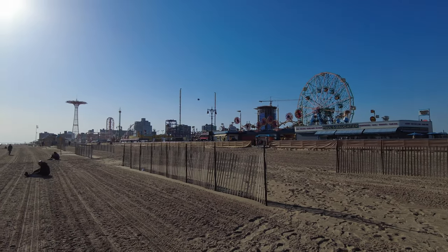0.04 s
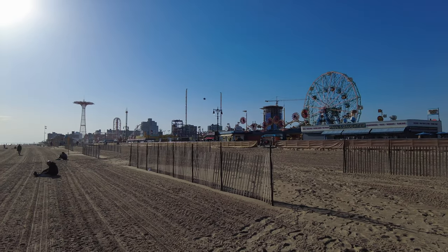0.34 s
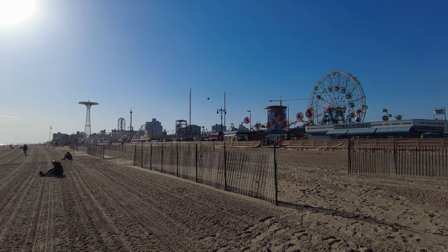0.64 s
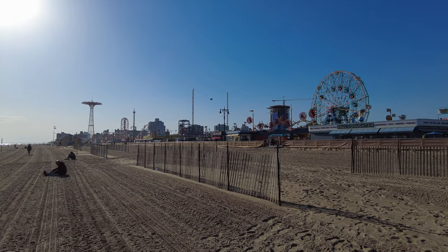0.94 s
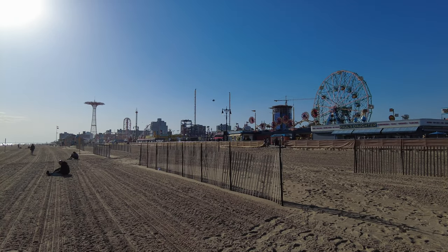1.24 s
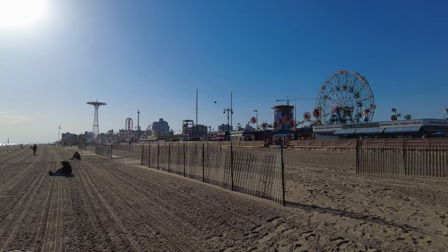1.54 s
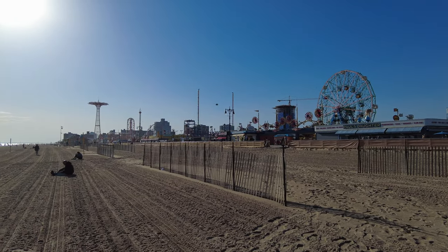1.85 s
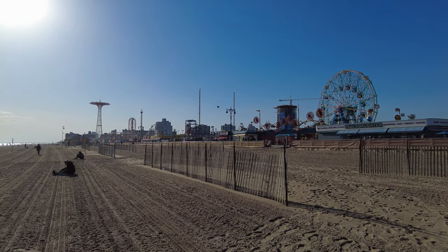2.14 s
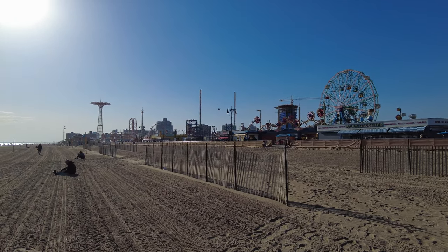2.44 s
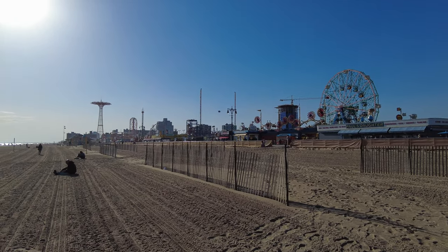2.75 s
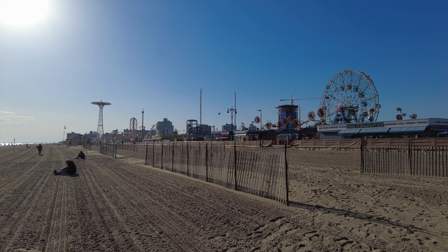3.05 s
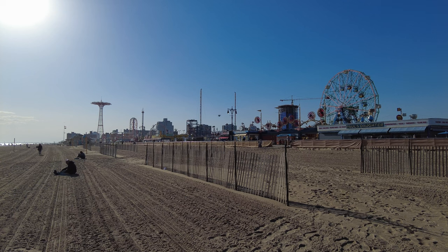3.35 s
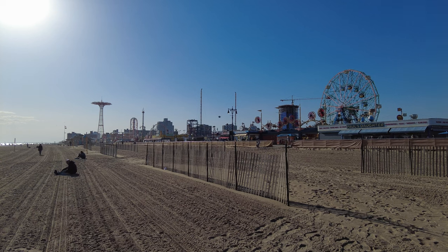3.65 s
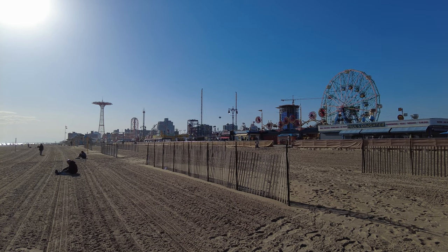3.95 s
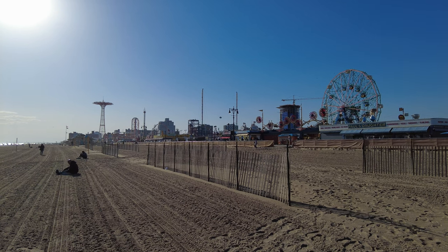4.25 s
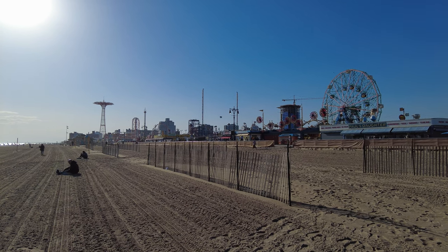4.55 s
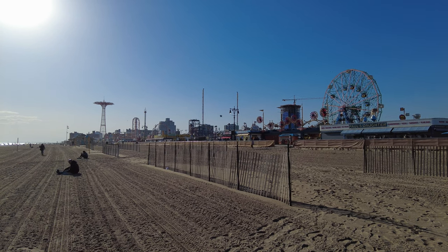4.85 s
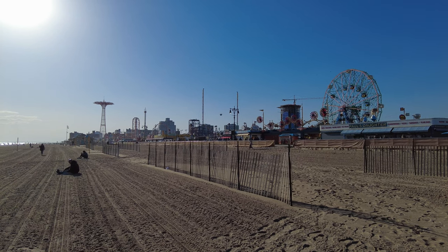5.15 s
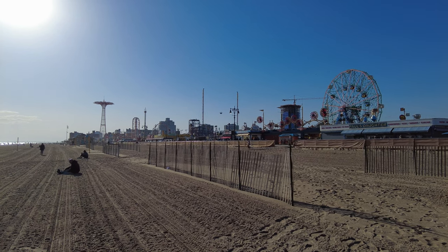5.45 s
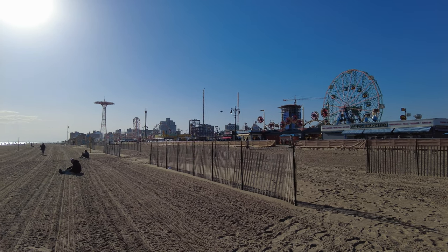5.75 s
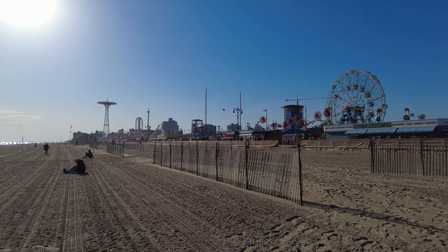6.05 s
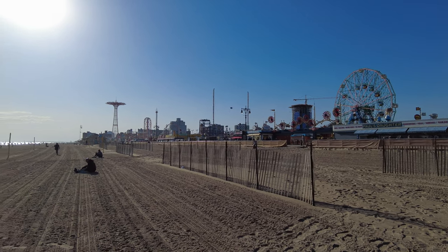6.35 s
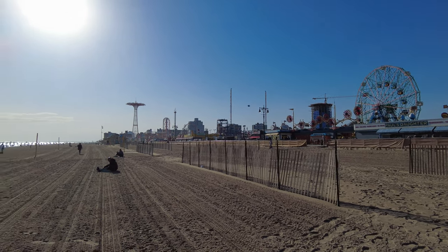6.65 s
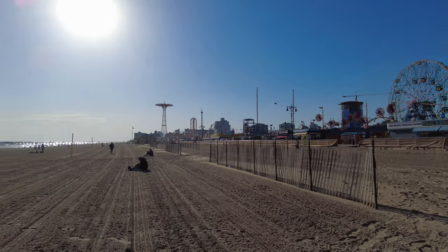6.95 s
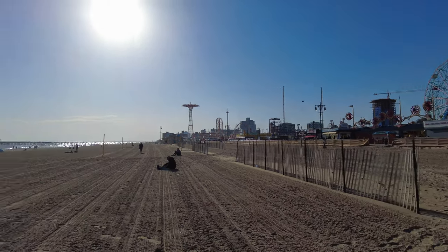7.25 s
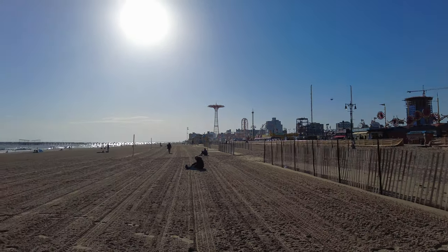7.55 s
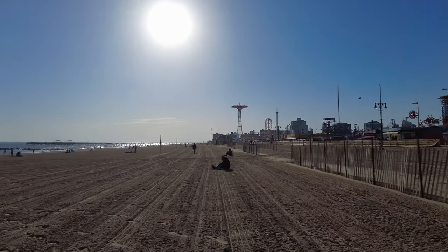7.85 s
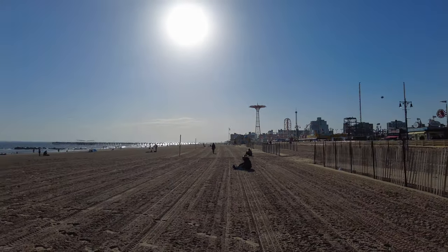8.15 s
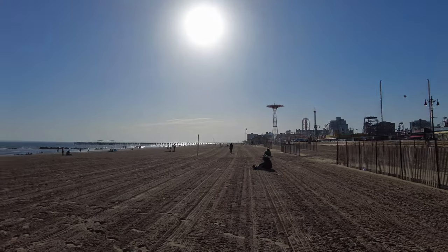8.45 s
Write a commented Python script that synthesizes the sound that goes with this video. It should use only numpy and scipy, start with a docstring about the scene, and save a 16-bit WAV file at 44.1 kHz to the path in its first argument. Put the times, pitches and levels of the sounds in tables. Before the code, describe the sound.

Low gusts of wind buffet the microphone on a beach, with waves washing faintly in the distance. A gull squawks, then brief, sharp yelps follow one after another from the right, some clear and some hoarse. The calls grow softer in the second half and end shortly before the close, leaving a light hiss of sea foam and a returning rumble of wind.

```python
"""Gulls on an open beach, over distant surf and wind buffeting two microphones. A low squawk opens,
then five yelps: short arched harmonic cries, the first cracking upward, the second breaking into a rasp.
Two tiny ticks at 2.3 s; the loudest yelps at 2.9 and 3.6 s; softer ones until 6.8 s, among two more
squawks and two faint far whistles. The cries come from the right, with a faint echo. Near 7.7 s the
surf brightens with the hiss of foam while the wind lulls; the wind rises again at the end."""
import sys
import numpy as np
from scipy import signal
from scipy.fft import rfft, irfft, next_fast_len
from scipy.io import wavfile
from scipy.ndimage import uniform_filter1d

SR = 44100
rng = np.random.default_rng(int(sys.argv[2]) if len(sys.argv) > 2 else 0)


def output_pcm(signal):
    """Save a mono or channel-first signal as 16-bit PCM at the path in sys.argv[1].

    Samples are clipped to [-1, 1] before scaling.
    """
    pcm = np.clip(np.atleast_2d(signal).T, -1, 1) * 32767
    wavfile.write(sys.argv[1], SR, np.round(pcm).astype(np.int16))


N = 378819
TIME = np.arange(N) / SR
ENDING_DB = -19  # fade over a cry's final fall


def gain_of(db):
    """Decibels to amplitude."""
    return 10 ** (np.asarray(db) / 20)


def unit_rms(x):
    """Scale to rms 1."""
    return x / np.sqrt(np.mean(x ** 2) + 1e-20)


def at_hz(points, hz):
    """Interpolate a table over log frequency."""
    f, value = np.transpose(points)
    return np.interp(np.log(hz + 1), np.log(f + 1), value)


def over_time(points):
    """Interpolate a table over the scene's time."""
    return np.interp(TIME, *np.transpose(points))


def add(mix, start_s, sound):
    """Mix a sound in at start_s."""
    part = mix[max(round(start_s * SR), 0):][:len(sound)]
    part += sound[:len(part)]


def coloured(x, spectrum):
    """Filter by a table of f/Hz, gain/dB."""
    size = next_fast_len(len(x))
    gain = gain_of(at_hz(spectrum, np.fft.rfftfreq(size, 1 / SR)))
    return irfft(rfft(x, size) * gain, size)[:len(x)]


def shaped_noise(count, spectrum):
    """Coloured noise, rms 1."""
    return unit_rms(coloured(rng.standard_normal(count), spectrum))


def wobble(count, corner_hz):
    """Low-passed random drift, rms 1."""
    size = next_fast_len(count)
    hz = np.fft.rfftfreq(size, 1 / SR)
    return unit_rms(irfft(rfft(rng.standard_normal(size)) / (1 + (hz / corner_hz) ** 2), size)[:count])


def surf(wash_db=7.0, foam_db=8, patchy_db=0.9849):
    """Far breakers: a dull wash and a hiss of foam, both in drifting patches."""
    # spectra of wash and foam: f/Hz, relative density/dB
    wash_spectrum = [(60, -2), (200, 4.5), (330, -3), (600, 1), (900, -2), (1300, -3.5), (2000, -8.5),
                     (3000, -16), (5000, -27.5), (9000, -37), (15000, -44)]
    foam_spectrum = [(600, -27), (2000, 3.5), (3500, 5), (5000, 0), (7000, -6), (10000, -14),
                     (12500, -23.5), (15500, -30.5)]
    # their swells: t/s, relative level/dB
    wash_swell = [(0, -53.5), (2.0, -53.5), (3.6, -55.5), (6.2, -55), (8.0, -53.5), (8.59, -54)]
    foam_swell = [(0, -68.5), (1.5, -67.5), (2.7, -70), (4.3, -73), (5.0, -70), (5.6, -72), (6.9, -71),
                  (7.7, -64.5), (8.59, -67)]
    # left-right likeness: f/Hz, correlation
    likeness = [(100, -0.6554), (300, 0.99), (600, -0.1175), (1200, 0), (4000, 0), (12000, 0)]
    # balance: f/Hz, left minus right/dB
    balance = [(60, 1.5), (130, 1.0), (290, 6.35), (640, 6.98), (1410, 6.143), (3100, 4.86), (6820, 2.929),
               (15000, 1.5)]
    frames, hz = N // 256 + 5, np.fft.rfftfreq(1024, 1 / SR)
    correlation = at_hz(likeness, hz)
    side_db = at_hz(balance, hz) / 2
    out = np.zeros((2, N))
    layers = (wash_spectrum, wash_swell, wash_db), (foam_spectrum, foam_swell, foam_db)
    for spectrum, swell, db in layers:
        a, b, c, d, patches = rng.standard_normal((5, frames, len(hz)))
        patches = unit_rms(uniform_filter1d(uniform_filter1d(patches, 20, axis=0), 12, axis=1))
        left = a + 1j * b
        right = correlation * left + np.sqrt(1 - correlation ** 2) * (c + 1j * d)
        bins = np.array([left * gain_of(side_db), right * gain_of(-side_db)])
        bins *= gain_of(at_hz(spectrum, hz) + patchy_db * patches)
        noise = signal.istft(bins.swapaxes(1, 2), nperseg=1024, noverlap=768)[1][:, :N]
        out += unit_rms(noise) * gain_of(db + over_time(swell))
    return out


def far_whistles(waver=0.0061):
    """Thin wavering tones, barely above the surf."""
    # whistles: t/s, length/s, f/Hz, level/dB
    whistles = [(5.104, 0.192, 1311, -60.5), (6.204, 0.39, 1303, -63)]
    out = np.zeros(N)
    for start_s, length_s, hz, db in whistles:
        count = int(length_s * SR)
        phase = 2 * np.pi * np.cumsum(hz * (1 + waver * wobble(count, corner_hz=41.96))) / SR
        add(out, start_s, gain_of(db) * np.sqrt(2) * np.sin(phase) * signal.windows.tukey(count, .5))
    return out


def ticks(decay_s=0.000657):
    """Tiny dry ticks: bright noise, dying in about a millisecond."""
    # ticks: t/s, initial level/dB
    hits = [(2.303, -53), (2.313, -60)]
    # their spectrum: f/Hz, relative density/dB
    spectrum = [(2000, -30), (6000, 2.5), (9000, -3.5), (13000, -3.5), (15000, -13)]
    out, t = np.zeros(N), TIME[:512]
    for start_s, db in hits:
        add(out, start_s, gain_of(db) * shaped_noise(len(t), spectrum) * np.exp(-t / decay_s))
    return out


def wind(gain_db=6.5, opposed=0.1735, lean_db=0.57, sway_db=0.13, lumpy_db=1.99, puff_s=0.0314):
    """Eddies press on the two microphones in lumps and puffs, partly in opposite senses."""
    # eddy rumble: f/Hz, relative density/dB
    rumble = [(6, -4), (16, 2), (30, 1.5), (50, -3), (80, -8.5), (120, -15), (180, -21.5), (280, -41),
              (500, -39), (1500, -83)]
    # slow rise and fall: t/s, relative level/dB
    breeze = [(0, -35), (0.8, -39.5), (1.6, -37), (2.9, -35), (3.7, -37.5), (4.5, -40.5), (5.0, -36.5),
              (5.25, -41.5), (5.75, -38.5), (6.05, -34), (6.3, -39), (6.85, -40), (7.75, -45.5),
              (8.05, -41), (8.35, -35.5), (8.59, -32.5)]
    # strongest puffs: t/s, level over the breeze/dB
    puffs = [(0.06, 3.5), (1.02, 7), (1.25, 5.5), (1.57, 7), (2.11, 6.5), (2.84, 5.5), (3.23, 2),
             (3.86, 4.5), (4.08, 3), (5.05, 4), (6.51, 5)]
    left = shaped_noise(N, rumble)
    right = np.sqrt(1 - opposed ** 2) * shaped_noise(N, rumble) - opposed * left
    side_db = lean_db + sway_db * wobble(N, corner_hz=0.58)
    puff_db = sum(db * np.exp(-((TIME - peak_s) / puff_s) ** 2) for peak_s, db in puffs)
    level_db = gain_db + over_time(breeze) + lumpy_db * wobble(N, corner_hz=5) + puff_db
    return np.array([left, right]) * gain_of(level_db + np.array([side_db, -side_db]))


def echoes(x, gap_s=0.016, taps_per_s=900):
    """Sparse reflections off sand, fence and buildings, different on each side."""
    # decay: f/Hz, T60/s
    t60 = [(500, 0.44), (2000, 0.555), (4500, 0.9), (10000, 0.31)]
    taps = rng.standard_normal((2, SR)) * (rng.random((2, SR)) < taps_per_s / SR) * (TIME[:SR] > gap_s)
    hz, t, bins = signal.stft(taps, SR, nperseg=256)
    tail = signal.istft(bins * gain_of(-60 * t / at_hz(t60, hz)[:, None]), SR, nperseg=256)[1]
    return signal.fftconvolve(x[None], tail / np.linalg.norm(tail[0]), axes=1)[:, :N]


def syrinx(hz, level_db, second_db, upper_db, rough, rasp_db=6.5, voice_db=1, slope_db_per_oct=8):
    """A gull's voice: eight harmonics; with roughness the cycles turn uneven and rasp."""
    # resonances of throat and open bill: f/Hz, gain/dB
    throat = [(2300, -3.5), (3100, 11.5), (3700, 16), (4500, 1.5), (5300, -5.5), (5900, -10.5), (6500, -4),
              (8000, -9.5), (10000, -17.5), (12000, -31), (14000, -35)]
    # rasp of a broken voice, and its hoarse upper edge: f/Hz, relative density/dB
    rasp_spectrum = [(600, -47), (850, -11.5), (1150, 3), (1550, -3), (1900, -1.5), (2400, -2), (3200, -12),
                     (3800, -10), (4700, -32), (6000, -30.5), (9000, -50.5)]
    edge_spectrum = [(2000, -23.5), (3000, 8), (3700, -5), (4900, -5), (6000, -3.5), (7000, -11),
                     (8500, -20), (11000, -33), (14000, -53)]
    rough, count = np.clip(rough, 0, 1), len(hz)
    jitter = (0.0039 + 0.0827 * rough) * wobble(count, corner_hz=380)
    phase = 2 * np.pi * np.cumsum(hz * (1 + jitter)) / SR
    lower = np.sqrt(2 * (1 - rough ** 2)) * (np.cos(phase) + gain_of(second_db) * np.cos(2 * phase))
    k = np.arange(3, 9)[:, None]
    share = gain_of(at_hz(throat, k * hz) - slope_db_per_oct * np.log2(k))
    upper = np.sqrt(2) * (share * np.cos(k * phase)).sum(0) / np.linalg.norm(share, axis=0)
    rasp = rough ** 1.8 * shaped_noise(count, rasp_spectrum)
    dissolved = np.clip(2.222 * rough, 0, 1)  # upper harmonics turn to noise first
    upper = np.sqrt(1 - dissolved ** 2) * upper + dissolved * shaped_noise(count, edge_spectrum)
    flutter = 1 + 0.3687 * rough * wobble(count, corner_hz=180)  # uneven membrane beats
    sound = gain_of(voice_db) * lower + gain_of(upper_db) * upper + gain_of(rasp_db) * rasp
    return gain_of(level_db) * flutter * sound * signal.windows.tukey(count, .06)


def arch(t, length_s, rise_s, first_hz, last_hz, scoop, drop, fall_s=0.037, attack_s=0.0234,
         onset_db=-21, sag_per_s=0.4692, sag_db_per_s=-51.5):
    """A cry scoops up, sags as it holds, slides down. Returns f/Hz, level/dB, fall progress 0-1."""
    hold_s = max(length_s - rise_s - fall_s, 1e-3)
    early_s = np.maximum(rise_s - t, 0)
    held = np.clip((t - rise_s) / hold_s, 0, 1)
    fall = np.clip(1 - (length_s - t) / fall_s, 0, 1)
    sag_s = hold_s * np.sin(np.pi * held) ** 2  # longer holds sag more
    bend = (1 - scoop * (early_s / rise_s) ** 2) * (1 - sag_per_s * sag_s) * (1 - drop * fall ** 2)
    hz = (first_hz + (last_hz - first_hz) * held) * bend
    attack_db = onset_db * np.tanh(early_s / attack_s) ** 2.045
    return hz, attack_db + sag_db_per_s * sag_s + ENDING_DB * fall ** 1.12, fall


def register(t, span_s, switch_s=0.00424):
    """Voice register gate: 1 within span_s, then 0; spans up to switch_s are ignored."""
    return np.clip((span_s - t) / switch_s + .5, 0, 1) * (span_s > switch_s)


def second_tone(length_s, top_hz, db, scoop=0.092, fade_db=-16):
    """The other side of the syrinx sounds a nearly pure tone that rises, swells and fades."""
    progress = np.linspace(0, 1, int(length_s * SR))
    hz = top_hz * (1 - scoop * (1 - progress) ** 4)
    level_db = db + fade_db * (2 * progress - 1) ** 2
    return syrinx(hz, level_db, second_db=-29, upper_db=-37, rough=np.full(len(hz), 0.27))


def squawk(length_s, rise_s, first_hz, last_hz, scoop, drop, db, upper_db, broken_s,
           settle_s=0.18, clearing_db=7, throb_db=0.88, bite_db=21, bill_db=11):
    """A low rough cry that breaks and throbs, brightens as the bill opens and clears in the fall."""
    t = np.arange(0, length_s, 1 / SR)
    hz, shape_db, fall = arch(t, length_s, rise_s, first_hz, last_hz, scoop, drop)
    broken, progress = register(length_s - t, broken_s), t / length_s
    settling = np.exp(-np.maximum(t - length_s + broken_s, 0) / settle_s)
    broken_db = -3.5 + throb_db * wobble(len(t), corner_hz=70)
    level_db = db + shape_db + broken * broken_db + clearing_db * fall
    second_db = -19.5 + bite_db * progress ** 2 * (1 - fall ** 2)
    upper_db = upper_db + bill_db * (progress - .5) + ENDING_DB * fall ** 2
    rough = (0.237 + 0.526 * broken * settling) * (1 - fall)
    return syrinx(hz, level_db, second_db, upper_db, rough)


def yelp(length_s, rise_s, first_hz, last_hz, scoop, drop, db, second_db, upper_db, hoarse,
         thin_s, broken_s, clearing_db=10, waver_db=2.33, bill_db=7, swell_db_per_s=340):
    """A high cry, growing hoarser; it may open thin and crack upward, or break into a rasp."""
    # second and upper harmonics as the pitch moves them through the throat: f0/Hz, relative level/dB
    second_by_pitch = [(1000, -23.5), (1200, -17), (1350, -6), (1500, -2.5), (1750, -8), (1920, -7.5),
                       (2060, -14), (2350, -18)]
    upper_by_pitch = [(1100, -11.5), (1450, -14.5), (1800, -19.5), (2080, -25.5), (2350, -21.5)]
    t = np.arange(0, length_s, 1 / SR)
    hz, shape_db, fall = arch(t, length_s, rise_s, first_hz, last_hz, scoop, drop)
    thin, broken = register(t, thin_s), register(length_s - t, broken_s)
    full, progress = 1 - thin, t / length_s
    hz = hz * 0.715 ** thin * 0.79 ** broken  # both registers lie lower
    depth = 1 + 0.0336 * (db + 27)  # softer cries have flatter envelopes
    level_db = db + full * depth * shape_db - 16.5 * thin + broken * (clearing_db * fall - 2.3)
    opening_db = bill_db * (progress - .5)  # harmonics gain as the bill opens
    swell_db = swell_db_per_s * (t - thin_s)  # thin harmonics swell up to the crack
    second_db = at_hz(second_by_pitch, hz) + full * (second_db + opening_db) + thin * (20.5 + swell_db)
    second_db += waver_db * wobble(len(t), corner_hz=70) - 9 * broken
    upper_db = at_hz(upper_by_pitch, hz) + full * (upper_db + opening_db) + thin * (10 + swell_db)
    upper_db += waver_db * wobble(len(t), corner_hz=70)
    rough = hoarse * progress ** 1.4 + 0.56 * broken * (1 - fall)
    return syrinx(hz, level_db, second_db, upper_db, rough)


def gulls(lag_s=0.0009642, echo_db=-25, slap_s=0.074, slap_db=-33):
    """Cries from the right: the shadowed left microphone hears them later and weaker."""
    # yelps: t/s, length/s, rise/s, f after rise/Hz, f before fall/Hz, scoop 0-1, drop 0-1, level/dB,
    # second harmonic offset/dB, upper harmonics offset/dB, hoarseness 0-1, thin start/s, broken end/s
    yelps = [ (0.181, 0.1256, 0.0448, 2007, 2002, 0.33, 0.16, -28, 2, 4, 0.04, 0.0397, 0.0038),
             (0.498, 0.1375, 0.0445, 1924, 1970, 0.37, 0.24, -32.5, 4.5, -5, 0, 0.0053, 0.0663),
             (0.873, 0.132, 0.0557, 2081, 2338, 0.55, 0.15, -27, 4, 1, 0.14, 0.0025, 0.0061),
             (1.263, 0.0947, 0.0353, 2070, 2103, 0.18, 0.16, -38, -1, -6, 0.09, 0.0031, 0.00723),
             (1.848, 0.0758, 0.0249, 2279, 2319, 0.06, 0.1, -43, 2, 4.5, 0.11, 0, 0.0033),
             (2.918, 0.1082, 0.0305, 2210, 2321, 0.06, 0.3, -25.5, -1.5, -2, 0.14, 0.000095, 0.0018),
             (3.597, 0.1197, 0.032, 2187, 1979, 0.08, 0.6, -25.5, -3.5, 1, 0.37, 0.000042, 0.0038),
             (4.198, 0.0914, 0.0482, 1804, 1833, 0.19, 0.29, -41, -3, -14, 0, 0, 0.0048),
             (4.609, 0.121, 0.03425, 2095, 2033, 0.03, 0.44, -29.5, -6.5, -6, 0.12, 0.000015, 0.0039),
             (4.923, 0.1156, 0.045, 2084, 2218, 0.13, 0.41, -33.5, -2, -2.5, 0.2, 0.042, 0.0047),
             (5.272, 0.0726, 0.034, 1790, 1830, 0.14, 0.21, -51.5, -2, -9, 0.05, 0, 0.0076),
             (5.723, 0.0896, 0.0406, 2146, 2139, 0.06, 0.18, -42.5, -6.5, -11, 0.22, 0, 0),
             (6.107, 0.119, 0.0333, 1978, 1909, 0.02, 0.13, -33.5, -0.5, -4, 0.2, 0.00054, 0.0662),
             (6.748, 0.079, 0.047, 1800, 1874, 0.58, 0.17, -46, -2.5, -2, 0, 0.01, 0.0053), ]
    # squawks: t/s, length/s, rise/s, f after rise/Hz, f before fall/Hz, scoop 0-1, drop 0-1, level/dB,
    # upper harmonics/dB, broken end/s
    squawks = [ (0.02, 0.0957, 0.0234, 1197, 1520, 0.02, 0.23, -39.5, -19, 0.069),
               (3.87, 0.137, 0.02514, 1260, 1193, 0.4, 0.29, -29.5, -10.5, 0.097),
               (6.423, 0.137, 0.02718, 1315, 1502, 0.1, 0.4, -37.5, -13.5, 0.1083), ]
    # second tones within squawks: t/s, length/s, top f/Hz, level/dB
    second_tones = [(3.872, 0.043, 3139, -34.5), (6.436, 0.0554, 2040, -40), (6.435, 0.079, 3368, -47.5)]
    # acoustic shadow: f/Hz, left minus right/dB
    shadow = [(900, 0), (1300, -9.5), (2100, -14), (3000, -13), (4200, -12), (6300, -20), (9000, -4.5),
              (14000, -5)]
    left, right, slap = np.zeros((3, N))
    for voice, cries in ((yelp, yelps), (squawk, squawks), (second_tone, second_tones)):
        for start_s, *row in cries:
            add(right, start_s, voice(*row))
    add(left, lag_s, coloured(right, shadow))
    add(slap, slap_s, right)  # one distinct reflection
    return np.array([left, right]) + gain_of(slap_db) * slap + gain_of(echo_db) * echoes(right)


def scene():
    """Gulls over surf and wind, in stereo."""
    return gulls() + far_whistles() + surf() + wind() + ticks()


def record(dry, cutoff_hz=15650):
    """Low-pass band limit."""
    lowpass = signal.firwin(511, cutoff_hz, window=("kaiser", 9), fs=SR)
    return signal.oaconvolve(dry, lowpass[None], "same")


dry = scene()
out = record(dry)
output_pcm(out)
```